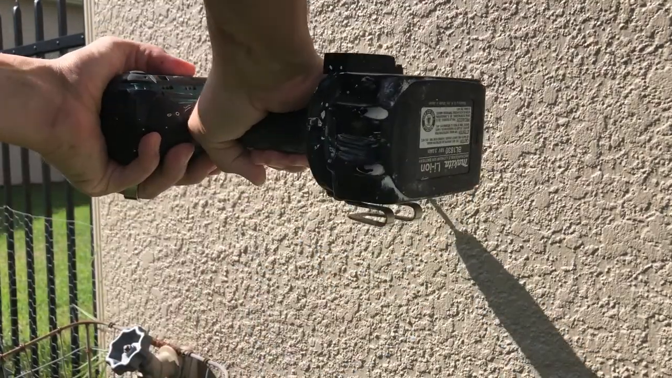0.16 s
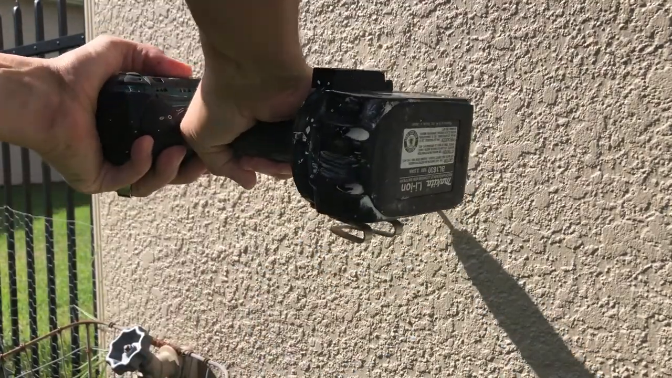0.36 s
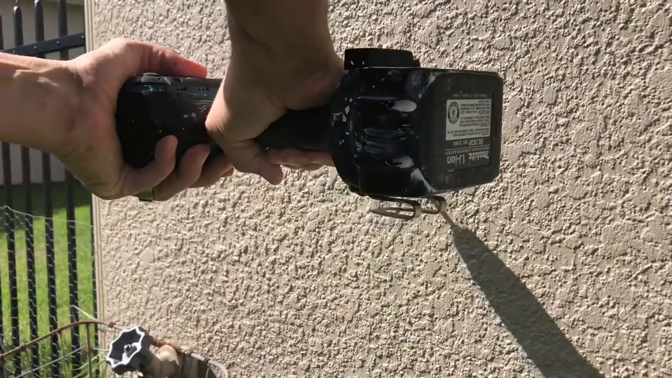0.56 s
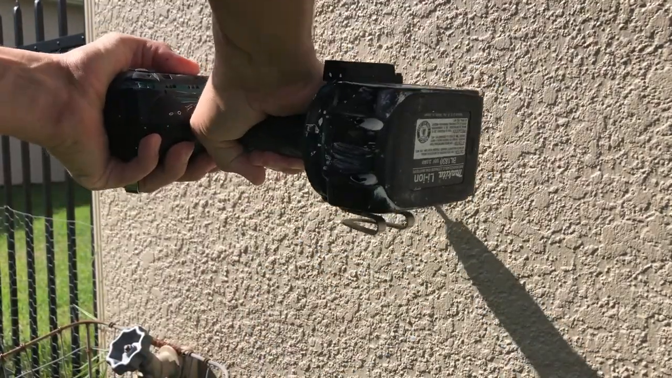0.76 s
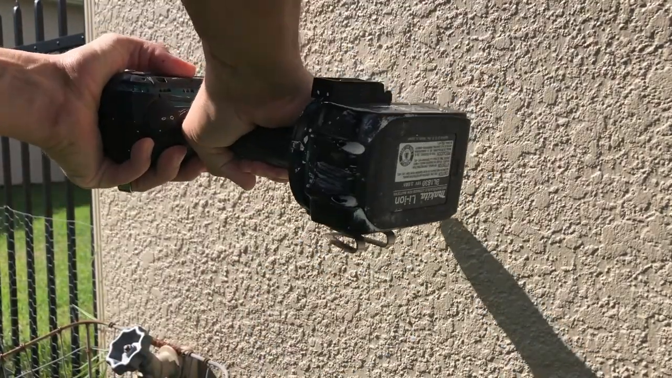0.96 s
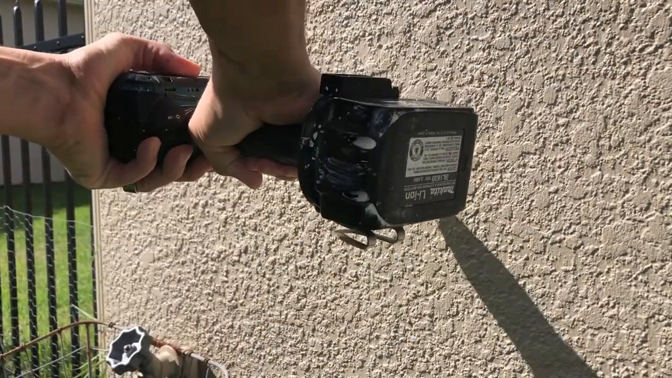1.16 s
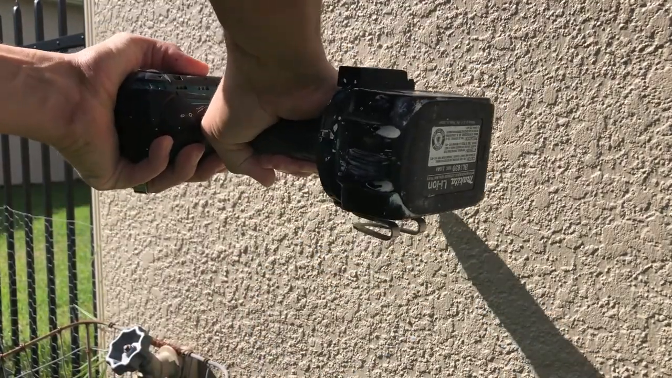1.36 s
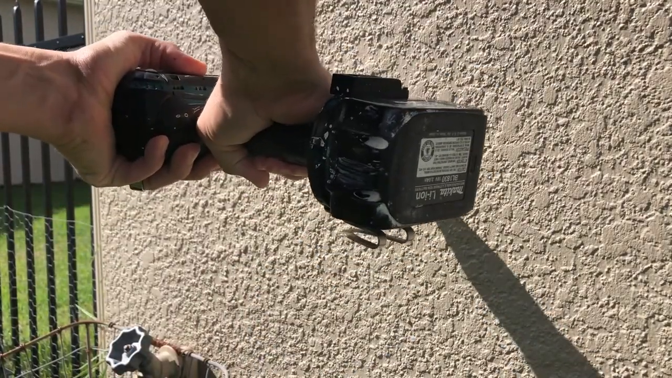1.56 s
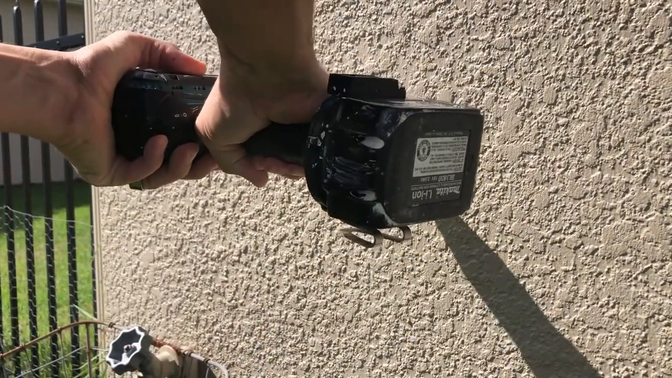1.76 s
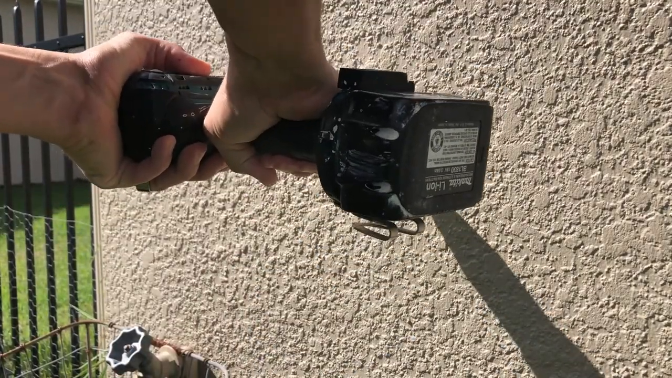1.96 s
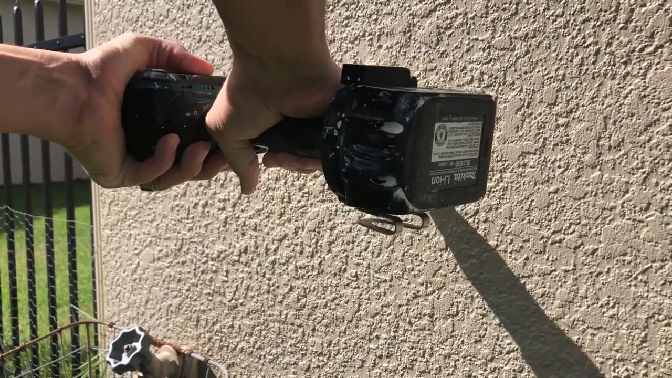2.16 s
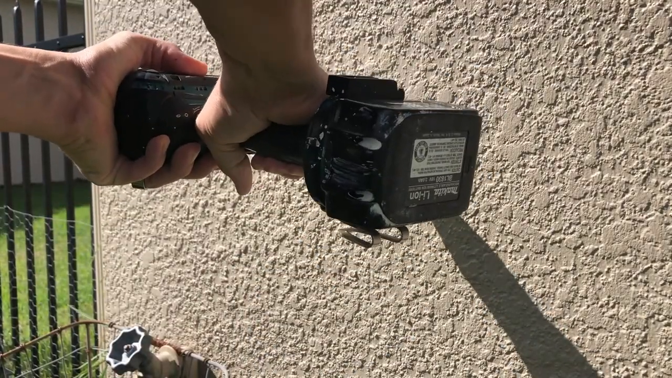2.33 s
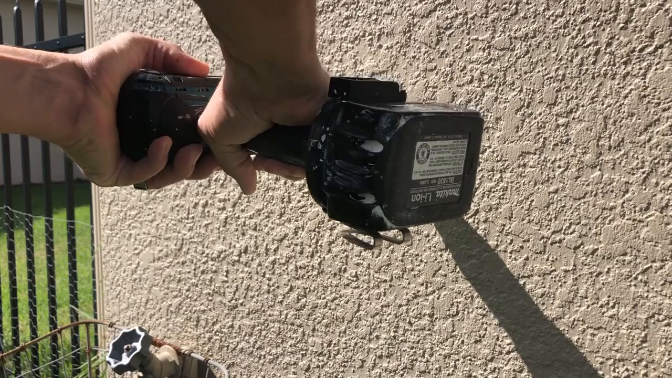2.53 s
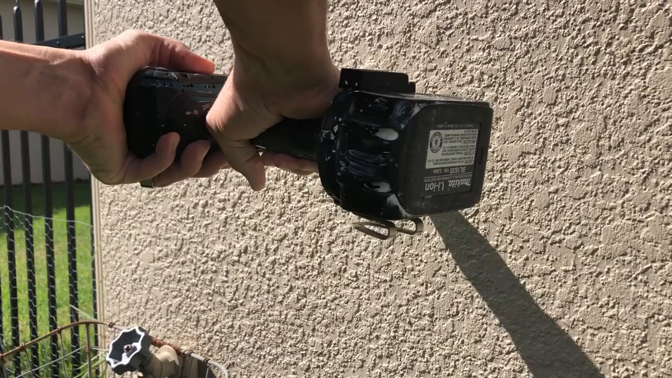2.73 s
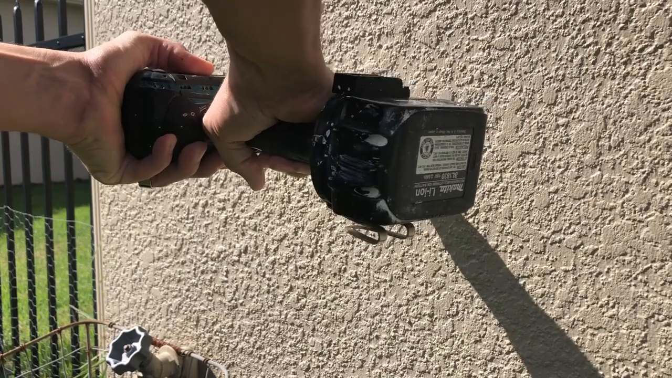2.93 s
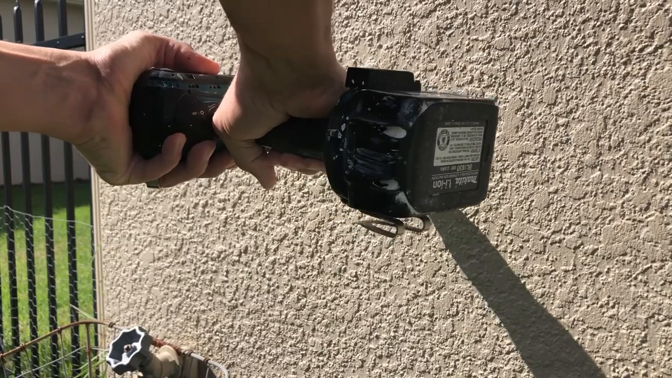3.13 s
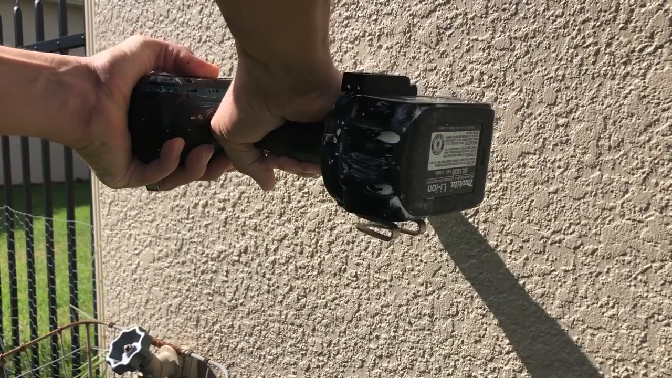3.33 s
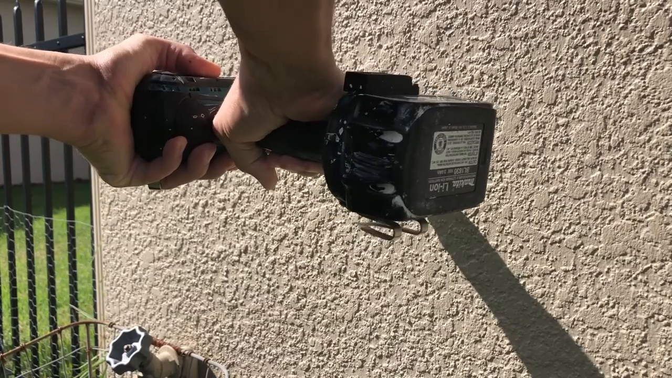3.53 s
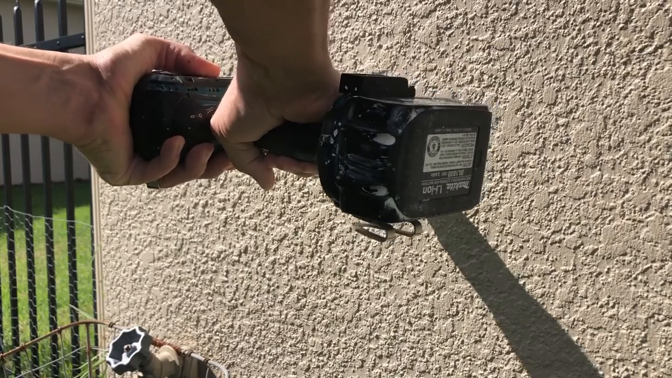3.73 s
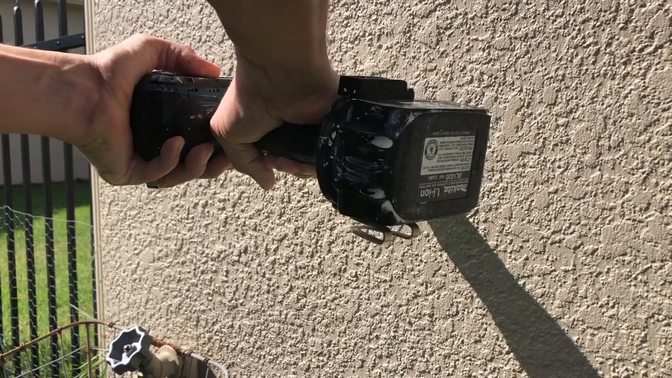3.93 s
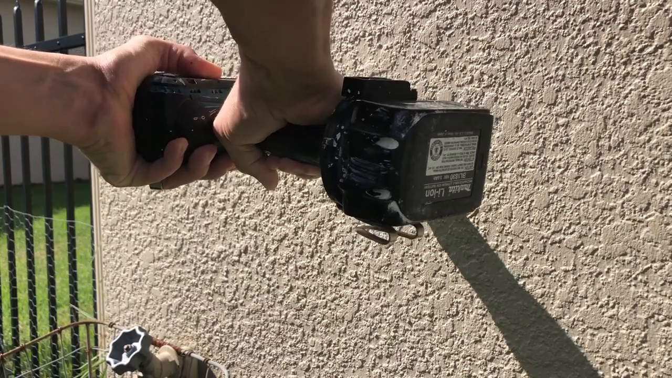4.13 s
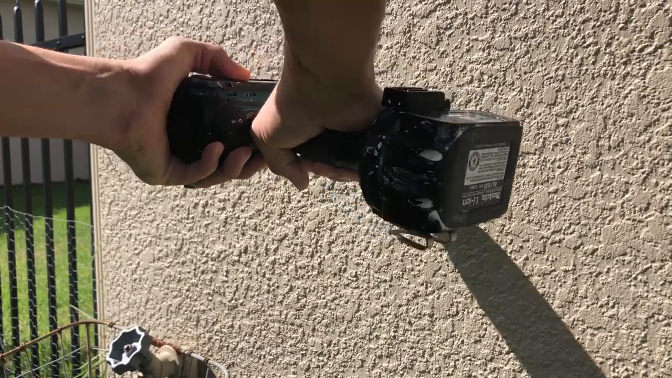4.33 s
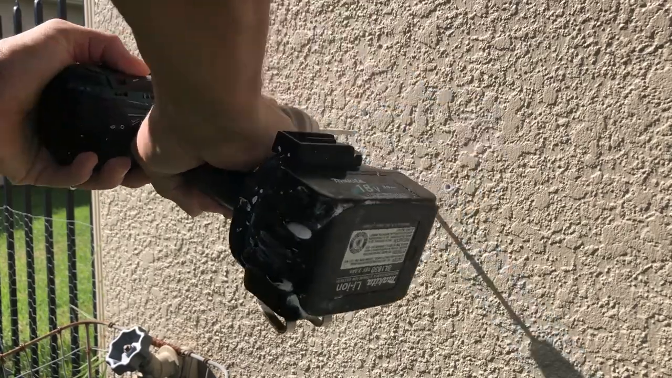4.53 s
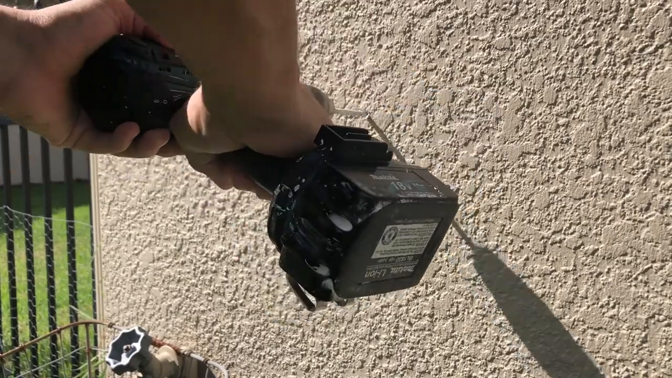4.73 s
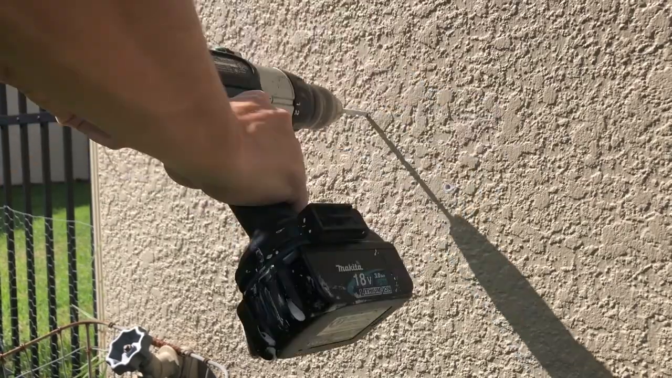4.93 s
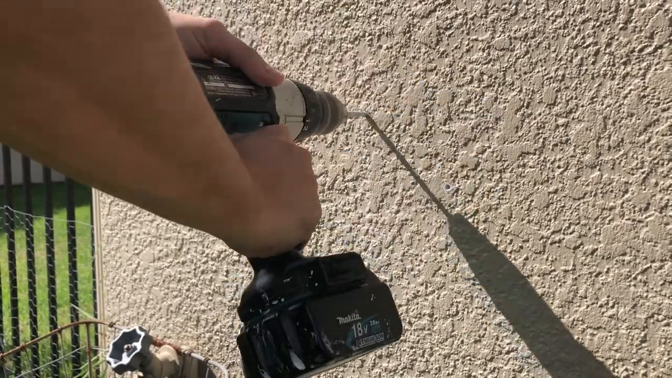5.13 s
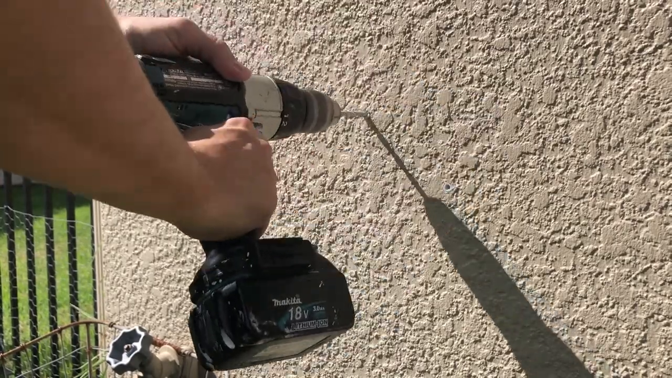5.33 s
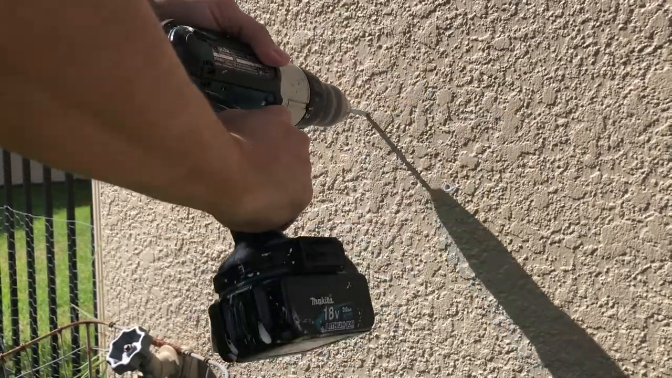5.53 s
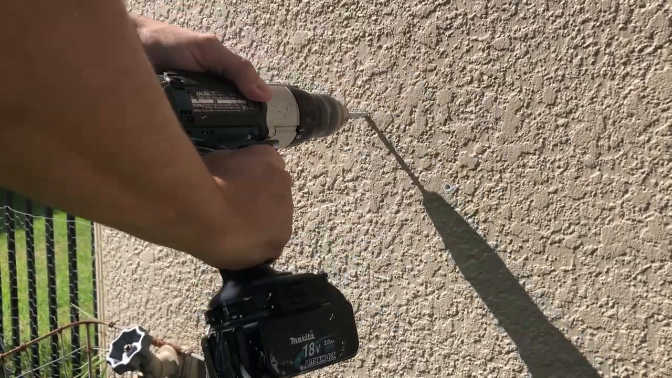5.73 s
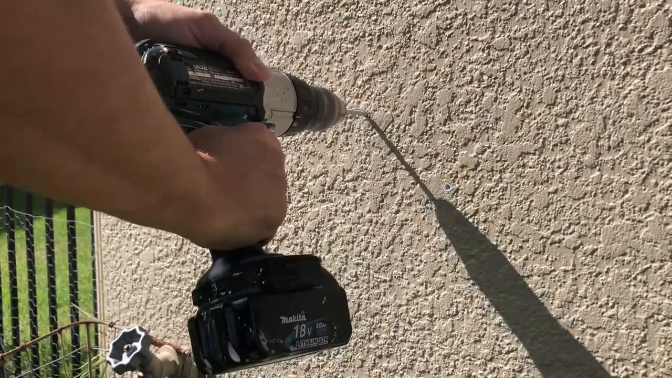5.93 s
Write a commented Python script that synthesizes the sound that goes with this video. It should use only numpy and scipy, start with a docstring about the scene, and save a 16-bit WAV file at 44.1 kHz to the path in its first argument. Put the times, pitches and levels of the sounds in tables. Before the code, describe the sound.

Outdoors, close and dry, a cordless drill starts low, quickly climbs in pitch and grinds into a stucco wall with harsh gear rattle and gritty crunching. After about four and a half seconds it slides down and stops with a clack. A brief near-silence holds small ticks and a faint distant hum, then the drill jerks back on, whining higher and looser in the open hole until the end.

```python
"""Outdoors, at a stucco wall: a cordless drill bores in with a masonry bit, eases off, stops, reruns in the
open hole. One motor speed drives all: gear teeth knock as shaped random impacts and whine as sines at multiples
of mesh rate. Cutting edges crush grit and flutes rub (shaped impacts), the drill whistles briefly (noise-
modulated tones), and the chuck clacks and grit cracks (decaying noise). A distant machine hums (wavering sines)
over air noise; one close microphone hears it in mono."""
import sys
import numpy as np
from scipy import signal
from scipy.fft import rfft, irfft, next_fast_len
from scipy.io import wavfile
from scipy.ndimage import uniform_filter1d, map_coordinates

SR = 44100
rng = np.random.default_rng(int(sys.argv[2]) if len(sys.argv) > 2 else 0)


def materialize(psi):
    """Save the field psi as 16-bit PCM at rate SR to the path in sys.argv[1].

    A 1-D psi becomes a single channel; in a 2-D psi each row is a channel.
    """
    bounded = np.clip(np.atleast_2d(psi).T, -1, 1)
    quanta = np.round(bounded * 32767).astype(np.int16)
    wavfile.write(sys.argv[1], SR, quanta)


N = 268569
TIME_S = np.arange(N) / SR

# Motor speed while boring, before wavering. Each row: time in seconds, gear mesh rate in Hz.
BORING_MESH_HZ = [(0, 1430), (0.04, 1500), (0.08, 1700), (0.13, 1545), (0.17, 1615), (0.28, 1630),
                  (0.34, 2114), (0.41, 2898), (0.45, 3106), (0.55, 3174), (0.86, 3102), (1.03, 3342),
                  (1.15, 3294), (1.23, 3158), (1.61, 3204), (1.8, 3080), (1.9, 3302), (1.93, 3748),
                  (1.97, 3870), (2.03, 3905), (2.09, 4075), (2.23, 4105), (2.39, 4403), (2.56, 4473),
                  (2.69, 4337), (2.77, 4484), (2.98, 4569), (3.06, 4369), (3.17, 4565), (3.25, 4391),
                  (3.49, 4315), (3.57, 4114), (3.69, 4243), (3.79, 4096), (4.09, 4498), (4.25, 4352),
                  (4.28, 4232), (4.4, 4420), (4.45, 4080), (4.5, 3570), (4.55, 2830), (4.6, 2310)]
# Motor speed in the open hole, sagging where the flutes catch. Each row: time in seconds, mesh rate in Hz.
FREE_MESH_HZ = [(5.1, 4780), (5.2, 4630), (5.35, 4650), (5.46, 4746), (5.53, 4590), (5.62, 4660),
                (5.73, 4720), (5.83, 4775), (5.9, 4735), (5.96, 4775), (6.09, 4745)]
# Gears pressed tight by thrust or running slack. Each row: time in seconds, slack 0-1.
GEAR_SLACK = [(0, 0.07), (4.22, 0.06), (4.45, 0.35), (4.6, 0.89), (6.09, 0.94)]
# Gear tones, carrier wobble to mesh overtones and sidebands. Each row: multiple of the mesh rate,
# relative level in dB slow, fast under thrust, fast and slack, and lift in dB while running down.
GEAR_TONES = [(.043, -46, -33, -34, 0), (.049, -33, -42, -42, 0), (.0704, -37, -35, -42, 0),
              (.82, -27, -31, -31, 0), (1, -17, -29, -29.5, -3), (1.048, -34, -23, -32, 14),
              (1.12, -27, -20, -31, -4), (1.25, -27, -27, -30, -4), (2, -11, -16, -13.5, -9),
              (2.168, -23, -19, -15, 8), (3, -24, -18, -18, 5), (4, -23, -26, -30, 0)]
# How well the housing radiates a tone. Each row: frequency in Hz, gain in dB.
RADIATION_DB = [(75, -19), (150, -4.5), (400, 0), (750, 3.5), (1600, -7), (2100, -1), (3200, -2.5),
                (3700, -3), (4300, -1), (4650, 6), (5000, 3), (5500, 1.5), (6350, -1.5), (6700, 1),
                (7200, -5), (8100, 6), (8650, -10), (9050, 4), (9300, -8.5), (9550, 2.5), (10100, 2),
                (10350, -5), (10700, 4), (12000, 4), (13300, 3.5), (14200, 1)]
# Colour of the tight housing. Each row: frequency in Hz, relative level in dB.
TIGHT_COLOUR_DB = [(650, -37.5), (1100, -14), (1920, -14), (2140, -9), (2700, -8), (3730, -8), (4710, -4),
                   (5380, -5.5), (6210, -0.5), (7250, -5.5), (10100, -2.5), (12000, -2.5), (15600, -2.5)]
# Colour of the slack housing. Each row: frequency in Hz, relative level in dB.
SLACK_COLOUR_DB = [(530, -56), (900, -32), (1180, -22), (2370, -7.5), (2830, -9.5), (3150, -5.5),
                   (4620, -5), (5080, -4.5), (6530, -4), (7530, 1), (8590, -4), (9680, -2), (11700, -6.5),
                   (14000, -5), (15600, -3.5)]
# Housing resonances. Each row: centre in Hz, width in Hz, lift in dB.
HOUSING_BELLS = [(2760, 480, 2.5), (3950, 250, 0), (4870, 690, -1), (6320, 500, -2), (6770, 770, 1.5)]
# Ringing of the steel bit before it sinks in. Each row: centre in Hz, width in Hz, lift in dB.
BIT_BELLS = [(7550, 660, 3.5), (8230, 270, -1.5), (8620, 450, 3.5), (9400, 560, -4), (11020, 1400, 3.5),
             (13350, 480, 4), (13900, 450, -7), (14400, 600, 0)]
# Nearly flat base under the bit's ringing. Each row: frequency in Hz, relative level in dB.
BIT_BASE_DB = [(100, 0.0053), (16000, 0.0039)]
# How hard the bit bites while boring. Each row: time in seconds, level in dB before the wall trim.
BITE_DB = [(0.0, -76), (0.1, -71), (0.43, -61.5), (0.68, -62), (0.82, -56.5), (1.02, -62.5), (1.22, -59.5),
           (1.32, -64), (1.9, -64), (2.11, -60), (2.43, -62.5), (2.48, -59), (3.78, -60), (3.93, -63.5),
           (4.18, -58.5), (4.56, -78.5), (4.6, -76)]
# Colour of the wall under the bit. Each row: frequency in Hz, relative level in dB.
WALL_COLOUR_DB = [(150, -40), (250, -34), (268, -20), (312, -2.5), (360, -21.5), (397, -4.5), (414, 0),
                  (478, -5), (534, -15.5), (694, 3), (960, -2), (1000, -1.5), (1060, -25), (1150, -15),
                  (1300, -29.5), (1690, -38), (2860, -120)]
# Colour of the wall around the open hole. Each row: frequency in Hz, relative level in dB.
HOLE_COLOUR_DB = [(150, -33), (250, -28), (270, -15.5), (351, -14), (613, -3), (921, -12.5), (1300, -16.5),
                  (1690, -50), (2860, -120)]
# Colour of the cracking crust. Each row: frequency in Hz, relative level in dB.
CRUST_COLOUR_DB = [(1500, -31), (2150, 0), (2700, 8), (3500, -16), (11000, -9), (15000, -19)]
# Short whistles and bright bursts of the drill, some of them gear tones falling as the motor runs down.
# Each row: start in seconds, length in seconds, midway pitch in Hz, width in Hz, level in dB.
DRILL_WHISTLES = [(4.288, 0.035, 14800, 900, -49), (4.289, 0.13, 5040, 450, -56),
                  (4.312, 0.12, 9940, 2000, -45), (4.383, 0.1, 9100, 450.8, -49.5),
                  (4.441, 0.12, 8020, 900, -50.5), (4.534, 0.086, 10400, 1400, -50.5),
                  (4.565, 0.049, 8000, 900, -52), (5.079, 0.14, 9100, 900, -51),
                  (5.097, 0.06, 4100, 1300, -49), (5.782, 0.13, 9060, 900, -54)]
# Flutes rub the side of the hole. Each row: start in seconds, length in seconds, scrape and wall levels in dB.
FLUTE_RUBS = [(4.234, 0.068, -55, -83), (4.81, 0.07, -73, -78), (4.864, 0.016, -77, -69),
              (5.058, 0.034, -62, -64), (5.085, 0.064, -54, -89), (5.152, 0.039, -56, -65),
              (5.441, 0.13, -54, -64), (5.797, 0.12, -51, -66.5), (5.927, 0.2, -51, -66)]
# Colour of sand on the flutes. Each row: frequency in Hz, relative level in dB.
SCRAPE_COLOUR_DB = [(600, -30), (1500, 1.0), (2400, 3), (4000, 10.0), (8000, 0.5), (11000, 0), (16000, -8)]
# Short knocks: clacks of chuck and bit, and grit cracking in the open hole after the restart. Each row: start
# in seconds, onset level in dB before trim, 60 dB decay in seconds.
SHORT_KNOCKS = [(4.517, -33.5, 0.0058), (4.751, -70, 0.01), (4.791, -66, 0.012), (4.8214, -66, 0.012),
                (4.845, -64, 0.012), (4.9, -63, 0.012), (4.986, -53, 0.012), (4.9903, -35, 0.0094),
                (5.16, -33, 0.014), (5.2557, -37, 0.0091)]
# Distant machine. Each row: frequency in Hz, level in dB before swell and waver.
HUM_TONES = [(118.4, -89), (196, -93), (226.1, -81.5), (279.9, -80.5)]
# Slow swell of the hum. Each row: time in seconds, gain in dB.
HUM_SWELL_DB = [(0, -2), (2.3, -3.5), (4.7, 0), (6.09, -3.5)]
# Outdoor air. Each row: frequency in Hz, relative level in dB.
AIR_COLOUR_DB = [(25, -31), (48, -25), (70, -11), (95, -5), (115, 0), (170, 0.5), (260, -3), (400, -5.5),
                 (700, -16), (1500, -15.5), (4000, -27), (11000, -30), (15000, -38)]

START_S, STOP_S, RESTART_S = 0.057, 4.595, 4.987  # trigger
ENGAGE_S, BRAKE_S, SPIN_UP_S = 0.03, 0.012, 0.04  # time constants
RING_OUT_S, UNLOAD_S = 0.033, 0.012  # rattle time constant after the stop; unloading ramp of the teeth before it
LOAD_WANDER, SLACK_JITTER = 0.0025, 0.0016  # rms shares of speed: uneven wall, backlash
MESH_PER_CARRIER, MESH_PER_EDGE = 42.6, 64  # mesh cycles per carrier turn and per cutting-edge pass
SLOW_MESH_HZ, HARD_MESH_HZ, SOFT_KNOCK_HZ = 1600, 3120, 9600  # soft knocks, hard knocks, treble edge of soft ones
SINK_S, SINK_LENGTH_S, BIT_RING_RISE = 0.3, 3.9, 0.085  # sinking of the bit; share by which its ring rises
GEAR_DB, GEAR_DB_PER_OCTAVE, REFERENCE_HZ = -46.5, 3.5, 4000
SLACK_DB, CREEP_DB = 0.07, -10.5  # gear lift at full slack; floor before the trigger takes hold
SPEED_UP_DB, SWEEP_OCTAVES_PER_S = -13, 2.5  # whine gain at full speed-up; scale of speed change
OPEN_HOLE_DB = -71  # light grinding, before the hole trim
WHISTLE_SAG_HZ_PER_S, WHISTLE_SKEW = 6000, 0.63  # skew under 1: attack quicker than release
TOP_HZ = 15800


def undb(db):
    """Decibels to gain."""
    return 10 ** (np.asarray(db) / 20)


def curve(rows):
    """Second column of a table, joined by straight lines in time."""
    times_s, values = np.transpose(rows)
    return np.interp(TIME_S, times_s, values)


def unit(x):
    """Scale to rms 1."""
    return x / np.sqrt(np.mean(x ** 2))


def rise(start_s, time_s):
    """Exponential approach from 0 to 1."""
    return 1 - np.exp(-np.maximum(TIME_S - start_s, 0) / time_s)


def lowpass(x, order, edge_hz):
    """Butterworth treble cut."""
    return signal.sosfilt(signal.butter(order, edge_hz, fs=SR, output="sos"), x)


def colour(x, points, bells=()):
    """Minimum-phase filter from (Hz, dB) points and bell-shaped resonances; output at rms 1."""
    size = next_fast_len(N + 8192) * 2
    hz = np.maximum(np.arange(size // 2 + 1) * SR / size, 1)
    point_hz, point_db = np.transpose(points)
    db = np.interp(np.log(hz), np.log(point_hz), point_db)
    for centre_hz, width_hz, lift_db in bells:
        db = db + lift_db * 2 ** -(2 * (hz - centre_hz) / width_hz) ** 2
    # folding the cepstrum makes the filter causal
    cepstrum = irfft(np.log(undb(db)))
    cepstrum[1:size // 2] *= 2
    cepstrum[size // 2 + 1:] = 0
    response = np.exp(rfft(cepstrum))
    return unit(irfft(rfft(x, size) * response)[:N])


def walk(rate_hz):
    """Smooth random drift with rms 1, a new target rate_hz times a second."""
    step = max(int(SR / rate_hz), 1)
    targets = rng.standard_normal(N)[:N // step + 1]
    return unit(uniform_filter1d(np.repeat(targets, step), step)[:N])


def impacts(rate_hz, spread_db):
    """Random tiny blows of either sign and uneven size, rate_hz a second on average; rms 1."""
    hit = rng.random(N) < rate_hz / SR
    sign = np.sign(rng.standard_normal(N))
    size = undb(spread_db * np.minimum(rng.exponential(size=N), 5))
    return unit(hit * sign * size)


def throb(turns, depth):
    """A swell once a turn, of mean power 1."""
    return unit(np.exp(depth * np.cos(2 * np.pi * turns)))


def stretch(x, factor):
    """Shift all frequencies of a steady sound by a moving factor."""
    return map_coordinates(x, [np.cumsum(factor)], order=5, mode="mirror")


def motor(slack):
    """Mesh rate in Hz: boring, braked to a halt, spun up in the open hole; load and backlash shake it."""
    boring_hz = curve(BORING_MESH_HZ) * (1 - rise(STOP_S, BRAKE_S))
    free_hz = curve(FREE_MESH_HZ) * rise(RESTART_S, SPIN_UP_S)
    waver = 1 + LOAD_WANDER * walk(35) + SLACK_JITTER * slack * walk(120)
    return np.maximum(boring_hz + free_hz, 1e-3) * waver


def speed_change(mesh_hz):
    """How fast the motor gains speed, from -1 (running down) to 1 (speeding up)."""
    octaves = np.log2(np.maximum(mesh_hz, 1000))
    octaves_per_s = uniform_filter1d(np.gradient(octaves) * SR, size=4000)
    return np.tanh(octaves_per_s / SWEEP_OCTAVES_PER_S)


def rattle(mesh, mesh_hz, slack):
    """Teeth knock: three times a carrier turn under thrust, ringing the bit; once and twice when slack."""
    carrier = mesh / MESH_PER_CARRIER
    ring = colour(impacts(rate_hz=22000, spread_db=2.0), BIT_BASE_DB, BIT_BELLS)
    depth = np.clip((TIME_S - SINK_S) / SINK_LENGTH_S, 0, 1)
    ring = unit(stretch(ring, 1 + BIT_RING_RISE * depth))
    tight = ring * throb(3 * carrier, depth=0.17) * undb(1.0 * walk(300) + 0.07 * walk(25.17))

    loose = impacts(rate_hz=20000, spread_db=1.0)
    loose = loose * throb(carrier, depth=0.21) * throb(2 * carrier, depth=0.13)
    loose = loose * undb(1.13 * walk(300) + 0.5 * walk(28))

    tight_knocks = undb(1.0) * colour(tight, TIGHT_COLOUR_DB, HOUSING_BELLS)
    loose_knocks = undb(1.52) * colour(loose, SLACK_COLOUR_DB)
    knocks = np.sqrt(1 - slack) * tight_knocks + np.sqrt(slack) * loose_knocks
    # slow teeth knock more dully
    dull = lowpass(knocks, 1, SOFT_KNOCK_HZ)
    hardness = np.clip((mesh_hz - SLOW_MESH_HZ) / (HARD_MESH_HZ - SLOW_MESH_HZ), 0, 1)
    return dull + hardness * (knocks - dull)


def whine(mesh, mesh_hz, slack, sweep):
    """Gear tones flutter, flare on housing resonances, and change level as the motor speeds up or runs down."""
    radiation_hz, radiation_db = np.transpose(RADIATION_DB)
    # slow teeth meet softly and make few overtones
    hardness = np.minimum(mesh_hz / 2800, 1)
    fast = np.clip((mesh_hz - 3400) / 600, 0, 1)
    out = 0
    for multiple, slow_db, tight_db, slack_db, coast_db in GEAR_TONES:
        fast_db = tight_db + slack * (slack_db - tight_db)
        level_db = slow_db + fast * (fast_db - slow_db)
        level_db = level_db + np.interp(multiple * mesh_hz, radiation_hz, radiation_db)
        level_db = level_db + np.where(sweep > 0, SPEED_UP_DB, coast_db) * sweep ** 2
        overtone_gain = hardness ** (2 * max(multiple - 1, 0))
        flutter = unit(undb(2.0 * walk(70) + 2.0 * walk(16)))
        phase = 2 * np.pi * multiple * mesh + 0.22 * multiple * walk(140)
        out = out + undb(level_db) * overtone_gain * flutter * np.sqrt(2) * np.sin(phase)
    return out


def gear_gain(mesh_hz, slack):
    """Gearbox loudness follows speed and slack."""
    return undb(GEAR_DB + GEAR_DB_PER_OCTAVE * np.log2(mesh_hz / REFERENCE_HZ) + SLACK_DB * slack)


def gearbox(mesh, mesh_hz, slack):
    """Rattle and whine: the gears sing from the first turn but hardly rattle until the trigger takes hold."""
    engaged = np.maximum(rise(START_S, ENGAGE_S), undb(CREEP_DB))
    ring_out = 1 - rise(STOP_S, RING_OUT_S) * (TIME_S < RESTART_S)
    knocks = engaged * ring_out * rattle(mesh, mesh_hz, slack)
    # the teeth stop singing as the brake takes over
    driven = np.clip((STOP_S - TIME_S) / UNLOAD_S, 0, 1) + (TIME_S > RESTART_S)
    tones = driven * np.sqrt(engaged) * whine(mesh, mesh_hz, slack, speed_change(mesh_hz))
    return gear_gain(mesh_hz, slack) * (knocks + tones)


def kick(from_hz=620, fall_s=0.14, decay_s=0.029, db=-60):
    """A short falling grunt as the motor jerks into motion."""
    age_s = np.maximum(TIME_S - RESTART_S, 0)
    phase = np.cumsum(from_hz * np.exp(-age_s / fall_s) * (age_s > 0)) / SR
    return undb(db) * np.exp(-age_s / decay_s) * np.sin(2 * np.pi * phase)


def grinding(mesh, slack):
    """Cutting edges crush grit, swelling at each edge pass; the wall colour gives way to the open hole's."""
    grit = impacts(rate_hz=1400, spread_db=2.0)
    grit = grit * throb(mesh / MESH_PER_EDGE, depth=0.099) * undb(0.64 * walk(25.36))
    wall = undb(-0.4) * colour(grit, WALL_COLOUR_DB)
    hole = undb(1.5) * colour(grit, HOLE_COLOUR_DB)
    boring_gain = undb(curve(BITE_DB)) * (1 - rise(STOP_S, BRAKE_S))
    open_gain = undb(OPEN_HOLE_DB) * rise(RESTART_S, SPIN_UP_S)
    return (boring_gain + open_gain) * (np.sqrt(1 - slack) * wall + np.sqrt(slack) * hole)


def crust(start_s=0.285, decay_s=0.58, db=-61):
    """Coarse grains of the stucco's hard skin crack as the tip breaks in."""
    grains = colour(impacts(rate_hz=900, spread_db=1.5), CRUST_COLOUR_DB)
    envelope = rise(start_s, ENGAGE_S) * (1 - rise(start_s, decay_s))
    return undb(db) * envelope * grains


def whistles(mesh):
    """Short whistles and bright bursts of the drill: noise bands on falling tones, throbbing at the edge rate."""
    noise = impacts(rate_hz=9000, spread_db=2.5) * throb(mesh / MESH_PER_EDGE, depth=0.22)
    out = 0
    for start_s, length_s, pitch_hz, width_hz, db in DRILL_WHISTLES:
        age_s = np.clip(TIME_S - start_s, 0, length_s)
        band = lowpass(noise, 2, width_hz / 2)
        falling_hz = pitch_hz - WHISTLE_SAG_HZ_PER_S * (age_s - length_s / 2)
        tone = np.sin(2 * np.pi * np.cumsum(falling_hz) / SR)
        envelope = np.sin(np.pi * (age_s / length_s) ** WHISTLE_SKEW)
        out = out + undb(db) * envelope * unit(band * tone)
    return out


def rubbing():
    """Each rub swells and fades: sand scrapes on the flutes and the wall around the hole booms."""
    sand = impacts(rate_hz=1500, spread_db=4.0)
    scrape = colour(sand, SCRAPE_COLOUR_DB)
    wall = colour(sand, HOLE_COLOUR_DB)
    out = 0
    for start_s, length_s, scrape_db, wall_db in FLUTE_RUBS:
        swell = np.sin(np.pi * np.clip((TIME_S - start_s) / length_s, 0, 1))
        out = out + swell * (undb(scrape_db) * scrape + undb(wall_db) * wall)
    return out


def clacks():
    """Short knocks of steel in the chuck and of grit cracking in the hole: decaying noise in the slack
    housing's colour."""
    ring = colour(rng.standard_normal(N), SLACK_COLOUR_DB)
    gain = 0
    for start_s, db, t60_s in SHORT_KNOCKS:
        decay_db = 60 * np.maximum(TIME_S - start_s, 0) / t60_s
        gain = gain + undb(db - decay_db) * (TIME_S >= start_s)
    return undb(0.5) * gain * ring


def outdoors():
    """A far machine's hum, wavering in level and phase, over soft air noise."""
    hum = 0
    for hz, db in HUM_TONES:
        level = undb(db + 2.0 * walk(4.2))
        hum = hum + level * np.sqrt(2) * np.sin(2 * np.pi * hz * TIME_S + 0.48 * walk(6))
    air = undb(-77.5) * colour(rng.standard_normal(N), AIR_COLOUR_DB)
    return undb(curve(HUM_SWELL_DB)) * hum + air


def scene():
    """One motor speed drives gears and bit; both channels carry the same sound."""
    slack = np.clip(curve(GEAR_SLACK), 0, 1)
    mesh_hz = motor(slack)
    mesh = np.cumsum(mesh_hz) / SR  # mesh cycles so far
    drill = gearbox(mesh, mesh_hz, slack) + kick() + whistles(mesh)
    bit = grinding(mesh, slack) + crust() + rubbing()
    return np.tile(drill + bit + clacks() + outdoors(), (2, 1))


def record(dry):
    """The microphone sheds the deep bass and the recorder cuts the top steeply."""
    thin = signal.sosfilt(signal.butter(2, 55, "highpass", fs=SR, output="sos"), dry)
    return signal.sosfilt(signal.ellip(10, .2, 70, TOP_HZ, fs=SR, output="sos"), thin)


dry = scene()
out = record(dry)
materialize(out)
```